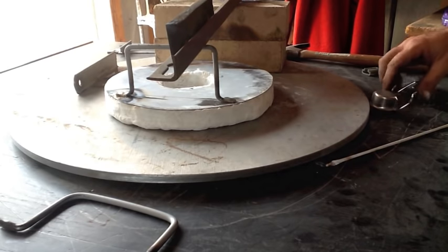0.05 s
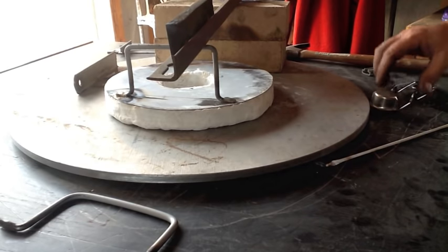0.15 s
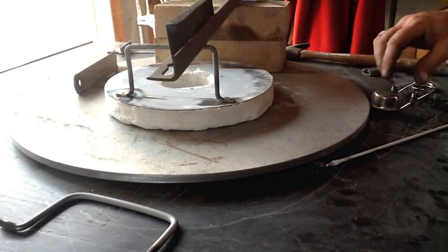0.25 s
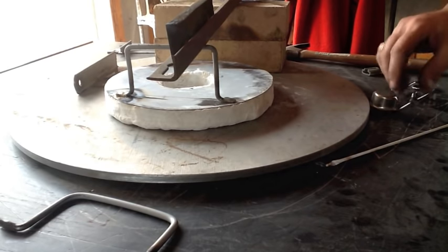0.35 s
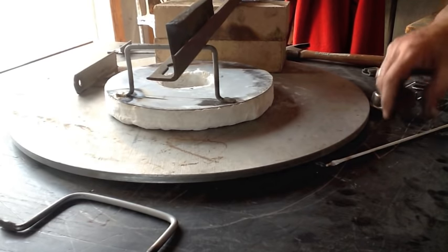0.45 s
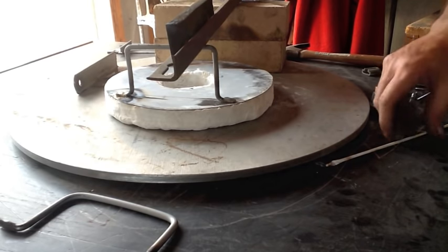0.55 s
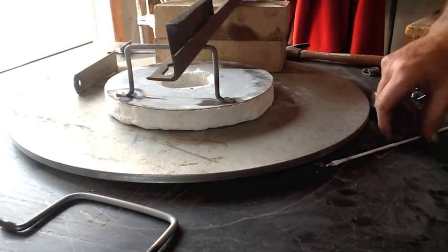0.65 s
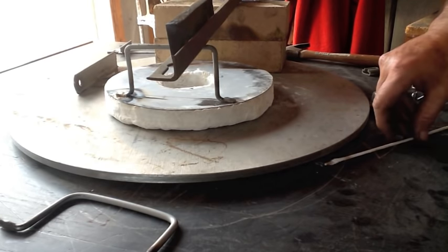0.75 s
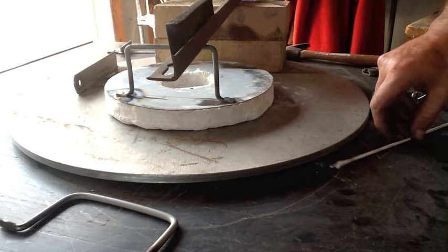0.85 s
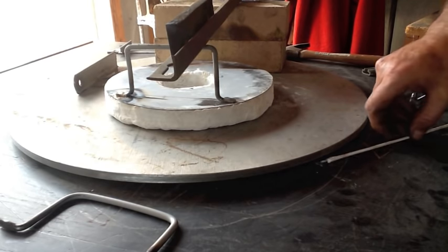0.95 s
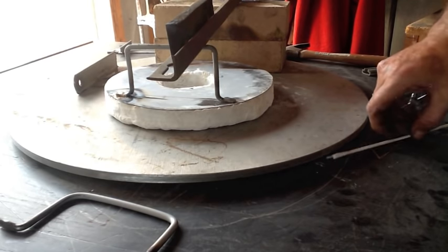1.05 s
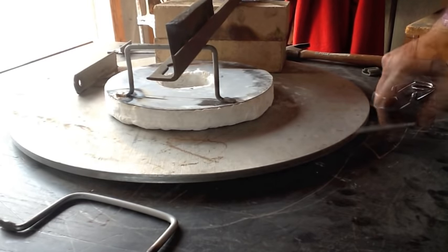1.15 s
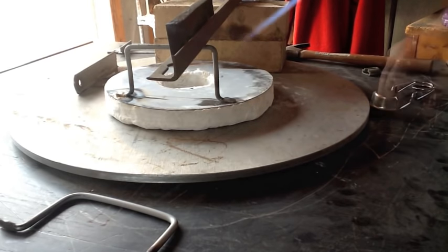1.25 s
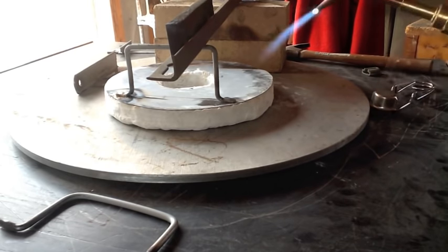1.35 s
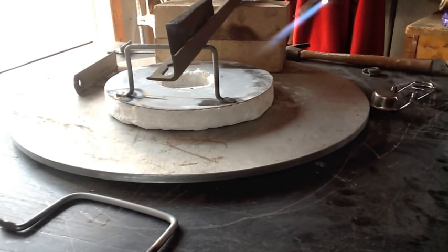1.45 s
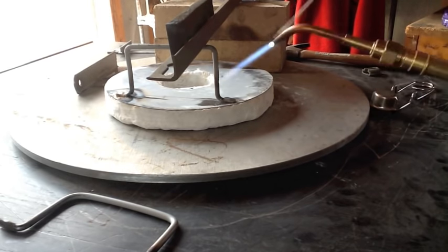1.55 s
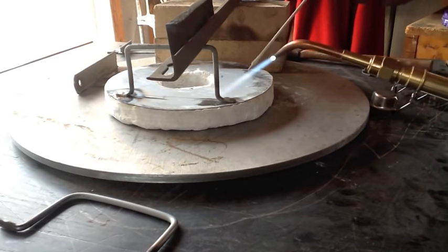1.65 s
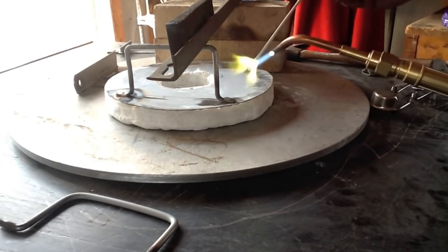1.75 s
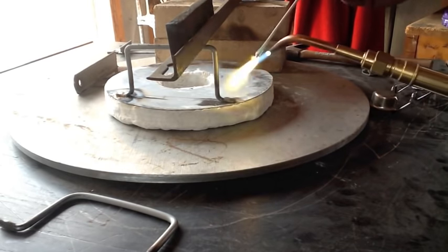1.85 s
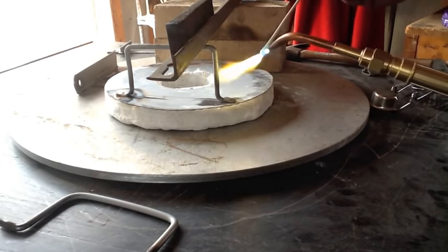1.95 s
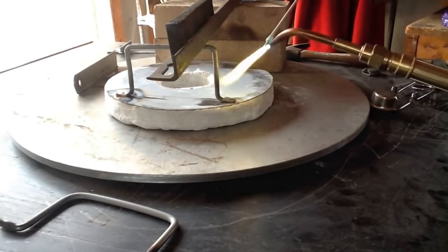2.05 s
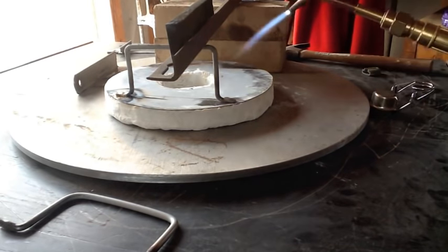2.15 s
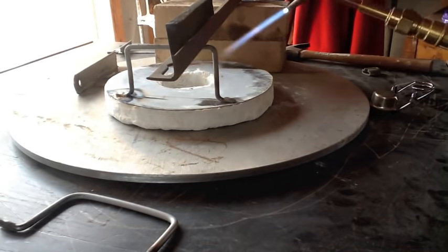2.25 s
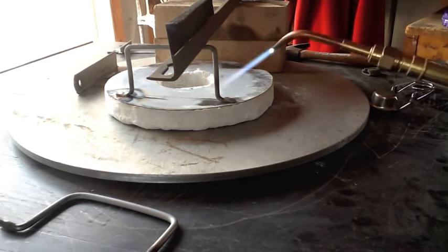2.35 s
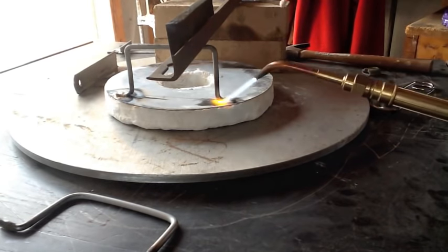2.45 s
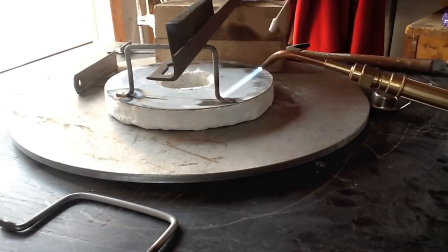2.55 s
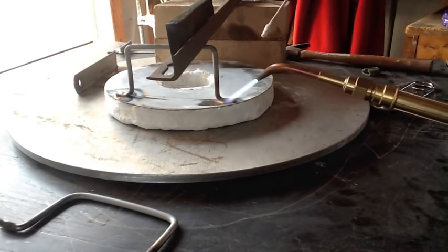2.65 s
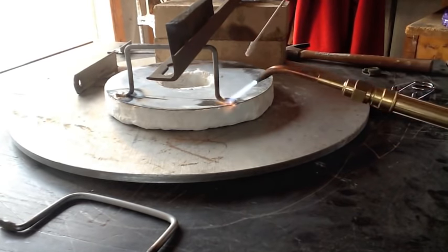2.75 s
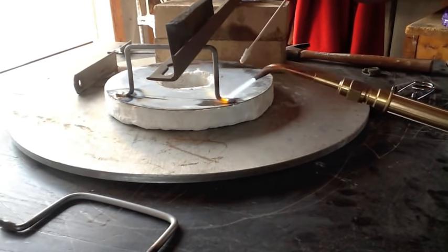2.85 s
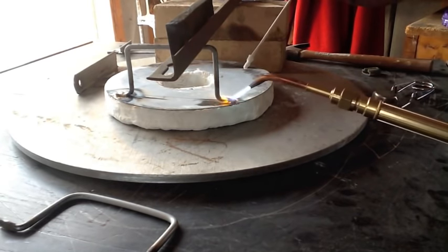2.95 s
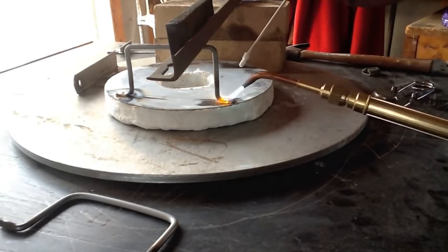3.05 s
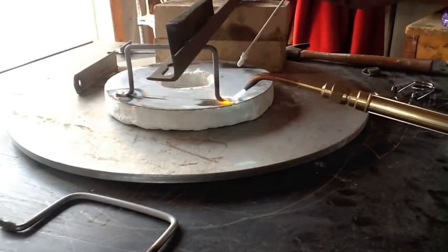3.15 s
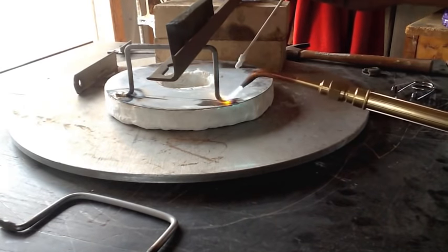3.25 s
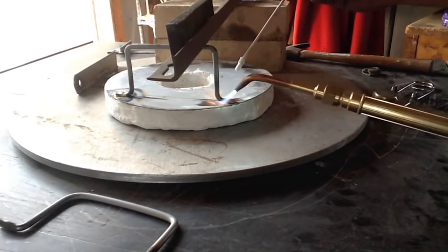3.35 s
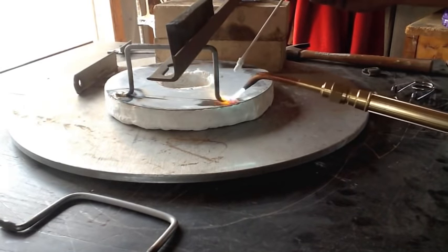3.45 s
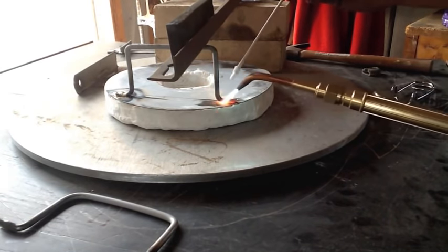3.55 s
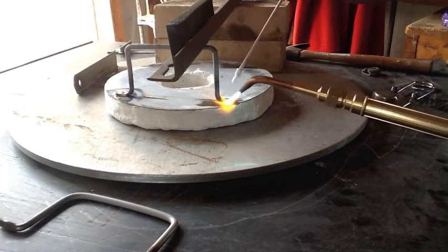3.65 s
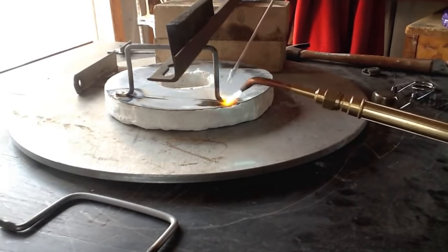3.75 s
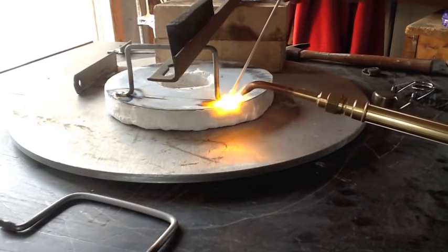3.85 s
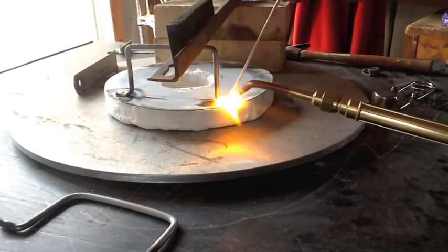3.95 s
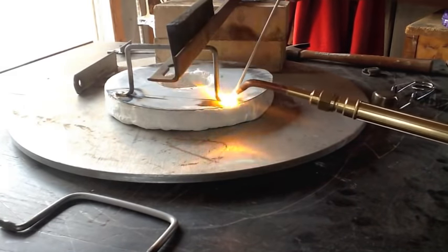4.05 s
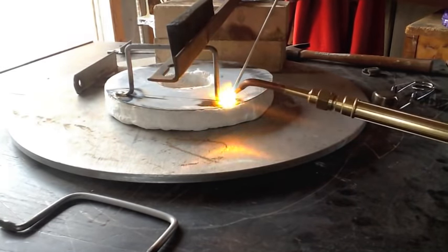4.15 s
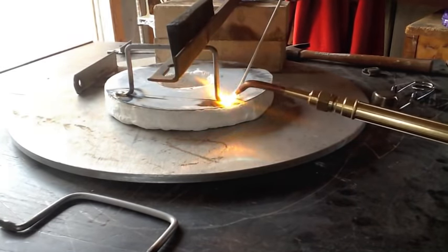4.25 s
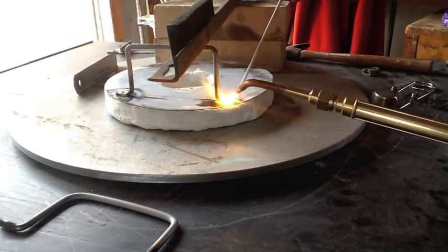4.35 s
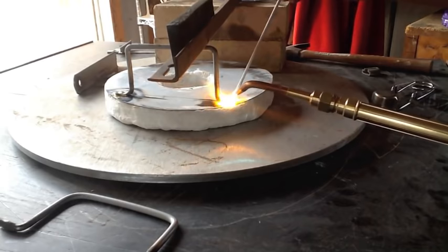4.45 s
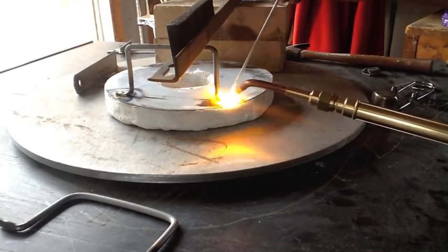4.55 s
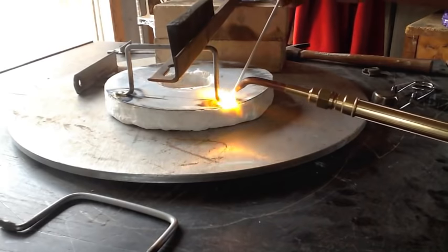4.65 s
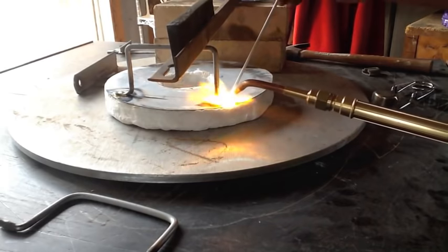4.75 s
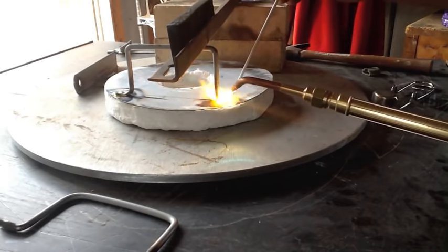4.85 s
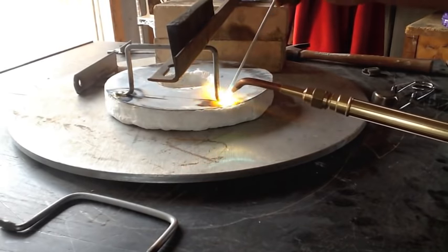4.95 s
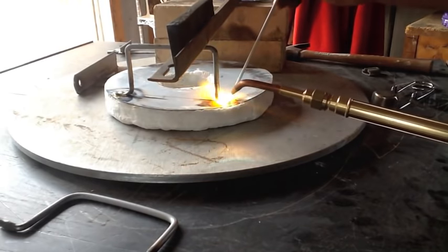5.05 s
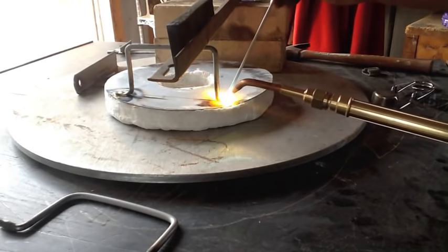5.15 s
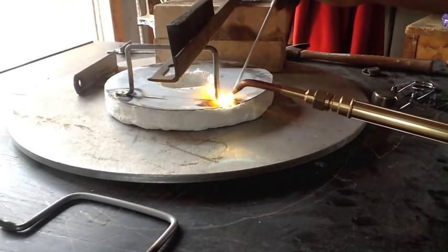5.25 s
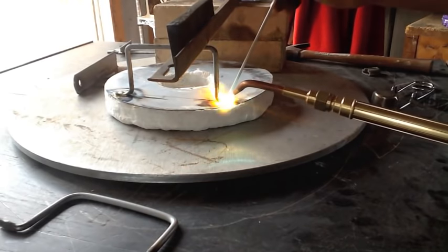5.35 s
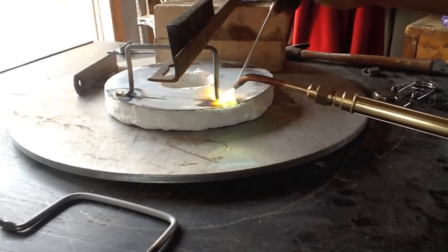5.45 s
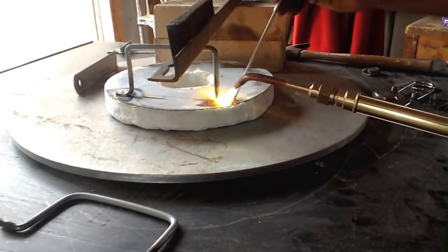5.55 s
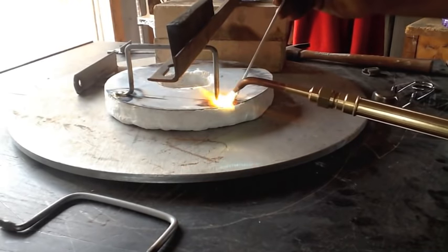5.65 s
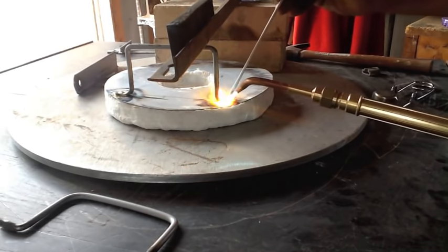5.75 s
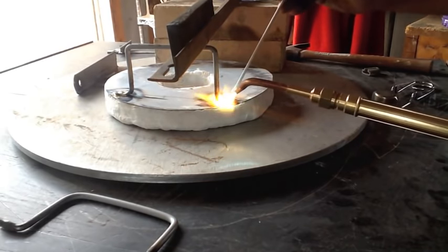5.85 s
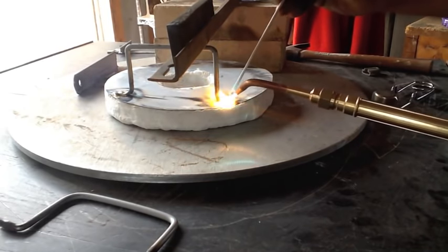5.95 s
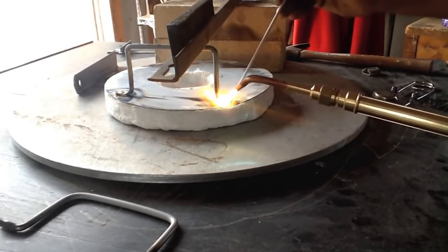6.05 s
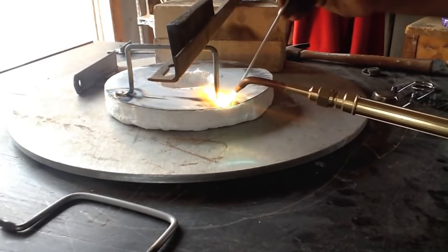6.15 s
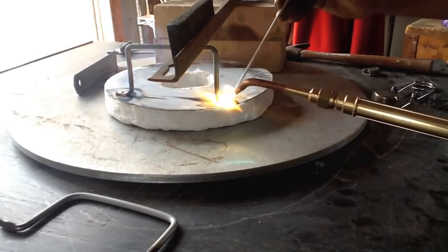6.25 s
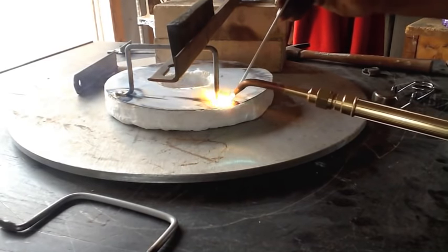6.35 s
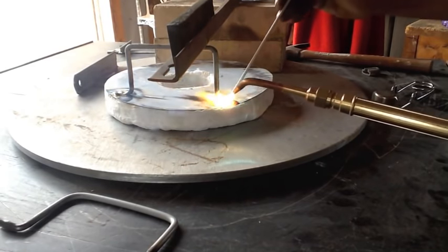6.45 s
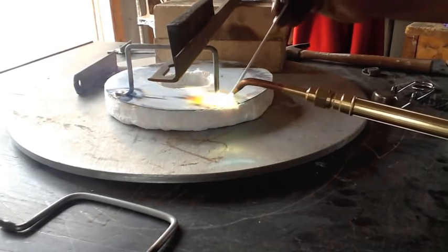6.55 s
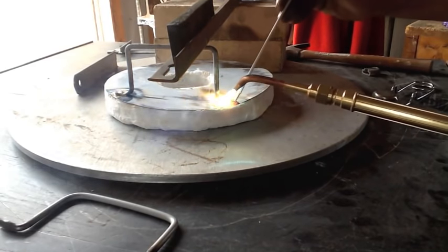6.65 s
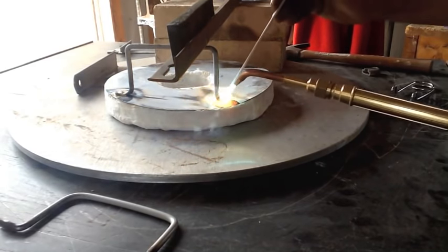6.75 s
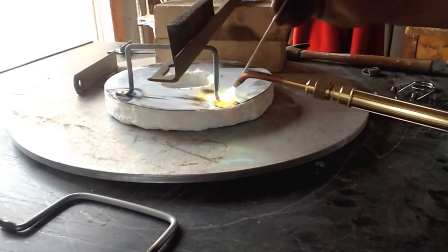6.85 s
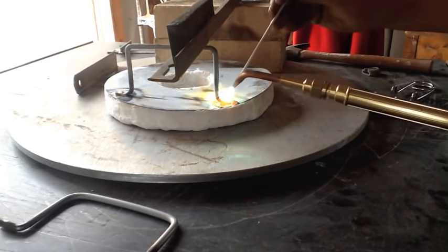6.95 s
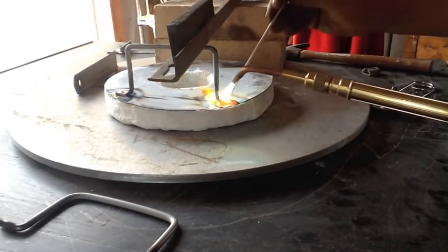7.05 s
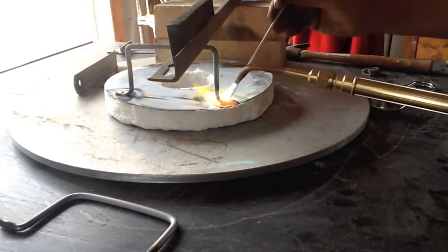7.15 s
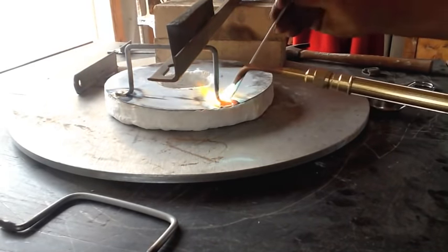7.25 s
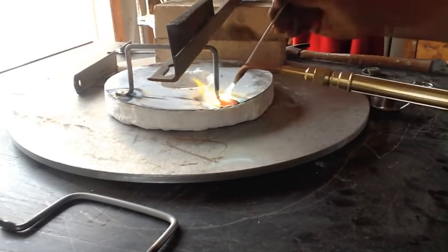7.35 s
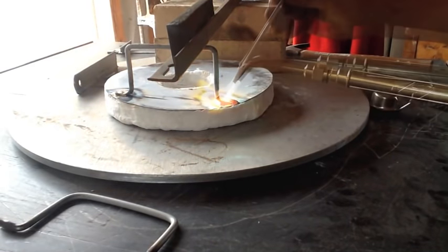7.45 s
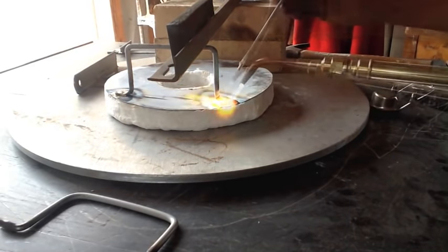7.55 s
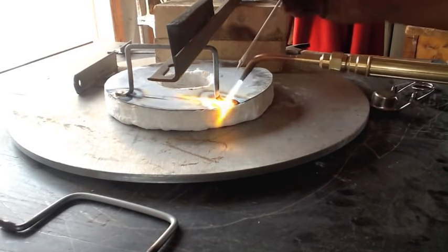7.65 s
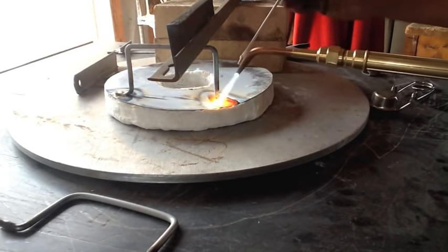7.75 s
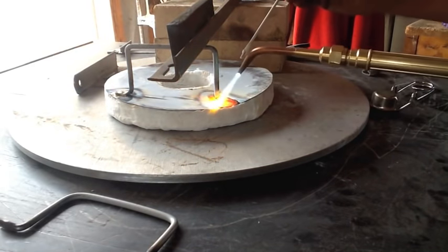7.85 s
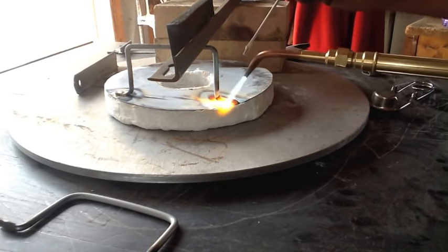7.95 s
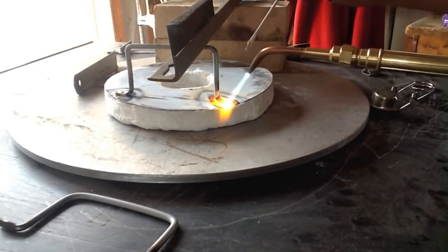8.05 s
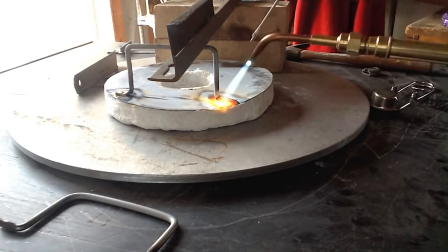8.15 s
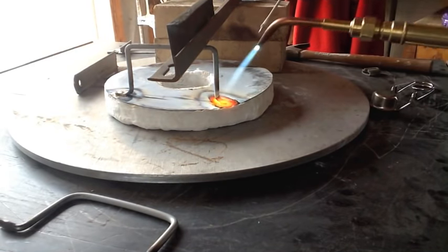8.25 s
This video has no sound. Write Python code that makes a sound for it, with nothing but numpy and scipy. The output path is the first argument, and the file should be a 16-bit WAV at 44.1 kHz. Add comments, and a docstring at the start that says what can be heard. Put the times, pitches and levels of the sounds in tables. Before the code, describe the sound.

A loud clack of steel set down on a bench opens the sound, with a quiet workshop motor hum behind it. The hum fades as a burning gas torch moves up close. Its smooth hiss carries uneven rasps, spits and soft pops, and it whistles faintly while heating a small metal joint. The hiss eases as the torch lifts off with a brief low flutter.

```python
"""A workshop bench: a steel tool slides and is set down with a clack, then a lit gas torch is brought
onto a small metal joint. The nozzle gives a smooth hiss; the burning gas rasps and surges, settles on
the metal, and whistles faintly on its edges while pockets of gas pop and spit. Lifted off, the flame
breaks into a short low roar. The shop's drone and motor hum fade as the torch comes close, and the
drone returns as it leaves."""
import sys
import numpy as np
from scipy import signal
from scipy.fft import rfft, irfft
from scipy.io import wavfile

SR = 44100
rng = np.random.default_rng(int(sys.argv[2]) if len(sys.argv) > 2 else 0)


def store_wav(level_fs):
    """Save 16-bit WAV to argv[1]."""
    pcm = np.round(np.clip(np.atleast_2d(level_fs), -1, 1) * 32767)
    wavfile.write(sys.argv[1], SR, pcm.T.astype(np.int16))


N = 365941
T = np.arange(N) / SR

# Table levels are relative: each layer has its own fader. Colours are spectra, in level per hertz.
# machine drone of the shop: frequency_hz, level_db
DRONE_COLOUR = [(40, -36), (80, -29.5), (110, -9), (150, -7), (240, -8.5), (340, -13.5), (600, -11.5),
                (890, -12), (1300, -18), (1900, -21.5), (2750, -24), (4450, -26), (9000, -30),
                (15000, -35.5)]
# motor hum, wavering and fading out: time_s, level_db
HUM_ENVELOPE = [(0, -41.5), (.3, -47), (.7, -44), (.86, -51.5), (1.1, -44.5), (1.35, -56.5), (1.48, -70),
                (1.56, -100)]
# harmonics of the hum: harmonic_number, level_db
HUM_HARMONICS = [(1, 0.5), (2, -9.5), (3, -23), (4, -18)]

# the steel tool slides on the bench: time_s, level_db
SLIDE_ENVELOPE = [(0, -30), (.015, -33.5), (.035, -38.5), (.053, -39), (.075, -73)]
# resonances of the slide: centre_hz, width_hz, level_db
SLIDE_RESONANCES = [(810, 320, -2.5), (1430, 250, -7), (2400, 830, -24), (5900, 200, -19),
                    (6740, 150, -10.5), (8740, 350, -16), (10500, 400, -15)]
# the tool lands and bounces: start_s, level_db, brightness_hz
CLACKS = [(0.054, -6.5, 15000), (0.0885, -17, 7000), (0.0915, -19.5, 4000), (0.1185, -32, 4500)]
# bright crack of each contact: frequency_hz, level_db
CRACK_COLOUR = [(1500, -30), (2200, 8), (4800, 3.5), (6000, -0.5), (9500, -2.5), (12500, -8), (14000, -12),
                (14900, 7), (15500, -16)]
# ring of the steel: pitch_hz, level_db, t60_s
TOOL_MODES = [(2070, -1, .08), (2225, -2, .14), (2278, -2, .13), (2339, -2, .21), (2397, -1, .12),
              (2625, -3, .16), (3236, 0, .14), (3466, 2, .14), (3935, -6, .18), (4879, -2, .1),
              (4907, -1, .15), (5925, -5, .16), (6568, -7, .17), (7041, -8, .18), (7675, -7, .12),
              (8786, -7, .14), (9156, -6.5, .17), (10730, -12, .18), (13050, -9, .24), (14680, -3, .07),
              (14905, -3, .09), (15130, -4, .07)]
# dead, hard knock of the bench top: pitch_hz, level_db, t60_s
BENCH_MODES = [(2300, -7.5, 0.049), (3540, -2.5, .012), (4830, 0, 0.012)]
# room tail behind the clack: frequency_hz, level_db
ROOM_TAIL_COLOUR = [(150, -4.5), (450, 4), (900, -5), (1550, -4.5), (2250, 0), (3000, -7), (4800, -6),
                    (7000, -8), (9500, -8.5), (12500, -18), (15000, -17)]

# the flame whistles on edges: start_s, length_s, first_hz, middle_hz, last_hz, level_db
EDGE_WHISTLES = [(1.7, .38, 1288, 1232, 1175, -49.5), (1.66, .36, 985, 925, 893, -57),
                 (4.35, 1.3, 525, 506, 498, -74), (4.45, .85, 728, 711, 698, -70),
                 (6.2, .55, 758, 762, 755, -71), (5.6, .4, 1245, 1250, 1255, -61),
                 (6.0, .45, 1460, 1482, 1470, -61), (5.8, .95, 419, 422, 425, -81),
                 (7.15, .55, 1215, 1198, 1178, -59.5)]
# the main whistle slides as the flame works along the joint: time_s, pitch_hz, level_db
JOINT_WHISTLE = [(4.08, 1092, -57), (4.31, 1057, -58), (4.42, 1048, -63), (4.57, 1039, -54),
                 (4.66, 1033, -54), (4.72, 1029, -50.5), (4.79, 1025, -53), (4.89, 1019, -50),
                 (5.06, 1012, -58), (5.22, 1008, -74), (5.55, 1022, -61), (6.06, 1047, -62),
                 (6.27, 1058, -51), (6.31, 1058, -56), (6.35, 1056, -50), (6.40, 1054, -57),
                 (6.46, 1052, -52.5), (6.52, 1048, -58), (6.575, 1044, -48), (6.63, 1037, -55),
                 (6.7, 1028, -57)]
# the jet grazes edges and hollows: start_s, length_s, centre_hz, width_hz, level_db
GRAZES = [(1.5, 0.21, 4970, 450, -51), (2.4, 0.45, 7060, 350, -59), (2.45, 0.47, 10250, 500, -65),
          (3.19, 0.19, 5230, 400, -56)]
# pockets of gas go off, some dull, some sharp: start_s, level_db, pitch_hz
POPS = [(2.825, -35, 2320), (2.850, -27.5, 1520), (2.859, -45, 1210), (2.8679, -27, 2380),
        (2.8835, -38, 1330), (2.892, -33, 1350), (2.985, -33, 1530), (3.037, -34, 1240),
        (3.048, -36.5, 1010), (3.115, -38, 900), (3.122, -37, 1160), (3.217, -34.5, 1110),
        (3.5862, -24.5, 1280), (3.596, -30, 1110), (3.626, -34, 1120), (3.63, -35, 1290),
        (3.962, -42, 1100), (4.042, -28, 1460), (4.160, -30.5, 1150), (4.171, -28, 1480),
        (4.180, -46.5, 1210), (4.260, -37, 1300)]
# bright ticks of spitting gas: start_s, level_db
SPITS = [(2.4544, -38), (2.483, -37), (2.5042, -34), (2.5574, -35), (2.5814, -37), (2.6854, -39)]
# the flame flutters raggedly: start_s, level_db, length_s
FLUTTERS = [(1.884, -45, 0.026), (2.184, -46, .037), (2.843, -41, 0.04), (2.864, -41, 0.04),
            (3.027, -45, 0.05), (3.255, -52, .02), (3.580, -38, 0.028), (3.616, -51, 0.024),
            (3.948, -43.5, 0.032), (4.005, -46, 0.018), (4.036, -46, .014), (4.153, -36, 0.037),
            (4.250, -42, 0.049), (4.315, -46, 0.024), (4.356, -46.5, .02), (5.912, -46, .03),
            (6.752, -46, 0.035), (6.885, -48, .02), (6.92, -49, 0.034), (6.962, -51, .028)]
# midrange body of the flutter: frequency_hz, level_db
FLUTTER_COLOUR = [(100, -42), (330, -19), (550, -2), (850, 7.5), (1500, 7.5), (3000, -20), (6000, -29)]
# hot metal fizzes: start_s, level_db, length_s
FIZZES = [(5.4061, -38, 0.021)]
# the flame roars as it is drawn back: time_s, level_db
ROAR_ENVELOPE = [(8.12, -49), (8.196, -41.5), (8.202, -38), (8.212, -46), (8.23, -40), (8.245, -34),
                 (8.28, -31.5), (8.295, -36)]
# low body of the roar: frequency_hz, level_db
ROAR_COLOUR = [(59, -45), (100, -14), (245, 2), (490, -8.5), (609, 2.5), (1030, -10), (1360, -12),
               (2120, -24), (3380, -30), (4000, -41), (5200, -66), (8800, -120)]
# the flame surges, rasping and hissing harder: start_s, rasp_db, hiss_db, length_s
SURGES = [(1.229, -49.5, -66, 0.088), (1.355, -52, -70, 0.2), (1.383, -51.5, -64, 0.046),
          (1.538, -44, -59, 0.059), (1.598, -47, -55, 0.048), (1.639, -43.5, -48, 0.064),
          (1.69, -44.5, -53, 0.076), (1.794, -40.5, -60, 0.022), (1.85, -51, -62, .05),
          (1.90, -47.5, -52, 0.08), (1.986, -45.5, -53, 0.057), (2.06, -48, -64, 0.031),
          (2.098, -44.5, -57, 0.084), (2.177, -44, -58, 0.043), (2.213, -51, -68, .045),
          (2.256, -47.5, -66, .068), (2.333, -43.5, -56, 0.03), (2.364, -49, -64, .03),
          (2.401, -43.5, -62, .045), (2.436, -48, -58, 0.037), (2.528, -49.5, -65, .1),
          (2.567, -54, -53, 0.02), (2.647, -51.5, -62, .03), (2.76, -56, -68, .035),
          (2.832, -49, -62, .055), (2.907, -55.5, -73, 0.94), (3.195, -62, -58, .08),
          (3.665, -58, -69, 0.05), (3.91, -66, -50, .043), (4.255, -56.5, -64, .045),
          (4.546, -55, -55, .075), (4.731, -46.5, -48, 0.056), (4.885, -51, -62, 0.05),
          (4.975, -50, -49, 0.039), (5.092, -45.5, -60, 0.051), (5.385, -51.5, -55, .045),
          (5.443, -49, -61, .03), (6.103, -48, -53, 0.032), (6.164, -50.5, -61, 0.059),
          (6.218, -49.5, -60, .052), (6.505, -54, -69, .075)]
# rasp of the burning gas: frequency_hz, level_db
RASP_COLOUR = [(700, -38), (1100, -8.5), (1550, -1.5), (1700, -1.5), (1900, 4), (2250, 0.5), (2500, -10.5),
               (2800, -1), (3150, -11.5), (3550, -4.5), (4100, -16), (4900, -7), (6500, -15.5),
               (12000, -42)]
# soft wash of flame over the work: frequency_hz, level_db
WASH_COLOUR = [(40, -39), (200, -41.5), (340, -37), (500, -24), (680, -19.5), (850, -12), (1000, -6),
               (1230, -5), (1650, -6.5), (1900, -6.5), (2500, -9.5), (3400, -13)]
# hiss of the nozzle: frequency_hz, level_db
HISS_COLOUR = [(1760, -24.5), (3000, -7), (3080, -9), (3470, -5.5), (4050, -5.5), (4880, -1.5), (6310, -1),
               (7670, -2.5), (10100, -7.5), (15200, -14), (15800, -18.5)]

ARRIVE_S, SWING_IN_S, AWAY_S, SWING_OUT_S = 1.07, 0.43, 7.906, 0.58   # the torch's move in and out
SETTLED_S, SETTLING_S = 2.56, 0.15   # the flame settles on the metal
DRONE_GONE_S, DRONE_FADE_S, DRONE_BACK_S, DRONE_RETURN_S = 1.527, 0.41, 7.357, 0.42
PEAK_LIMIT, CUTOFF_HZ = .85, 15800


def from_db(db):
    """Decibels to gain."""
    return 10 ** (np.asarray(db) / 20)


def rms_one(x):
    """Scales a signal to rms 1."""
    return x / np.sqrt(np.mean(x ** 2) + 1e-20)


def ramp(silent_s, length_s):
    """A fade from 0 at silent_s to 1 a length later (earlier, if the length is negative)."""
    return np.clip((T - silent_s) / length_s, 0, 1)


def arch(start_s, length_s):
    """A rounded swell and fade."""
    progress = ramp(start_s, length_s)
    return 2 * np.sqrt(progress * (1 - progress))


def swells(events):
    """Each event flares up quickly and sinks back over its length."""
    return sum(from_db(db) * np.sin(np.pi * np.sqrt(ramp(s, length))) for s, db, length in events)


def surge(start_s, length_s, edge_s=0.011):
    """Quick attack, hold, quick release."""
    return ramp(start_s, edge_s) * ramp(start_s + length_s, -edge_s)


def gain_curve(rows, fade_s=0.094):
    """Levels in dB joined by straight lines, dying away outside their span."""
    s, db = np.transpose(rows)
    outside_s = np.maximum(s[0] - T, 0) + np.maximum(T - s[-1], 0)
    return from_db(np.interp(T, s, db)) * np.exp(-(outside_s / fade_s) ** 2)


def drift(rate_hz):
    """A smooth random wander, mostly slower than rate_hz; rms 1."""
    hz = np.arange(N // 2 + 1) * SR / N
    return rms_one(irfft(rfft(rng.standard_normal(N)) / (1 + (hz / rate_hz) ** 2), N))


def flicker(depth_db, rate_hz):
    """An unsteady gain with mean power 1."""
    return rms_one(from_db(depth_db * drift(rate_hz)))


def noise(colour, skirt_db_per_octave=26):
    """Noise of the given colour, falling steeply past its ends; rms 1."""
    hz, db = np.transpose(colour)
    octave = np.log2(np.maximum(np.arange(N // 2 + 1) * SR / N, 1))
    points = np.log2(hz)
    beyond = np.abs(octave - np.clip(octave, points[0], points[-1]))
    spectrum = from_db(np.interp(octave, points, db) - skirt_db_per_octave * beyond)
    return rms_one(irfft(rfft(rng.standard_normal(N)) * spectrum, N))


def resonant_noise(peaks):
    """Broad resonances, each rung by its own noise; rms 1."""
    out = 0
    for hz, width_hz, db in peaks:
        r = np.exp(-np.pi * width_hz / SR)
        poles = [1, -2 * r * np.cos(2 * np.pi * hz / SR), r * r]
        out = out + from_db(db) * (1 - r * r) * signal.lfilter([1, 0, -1], poles, rng.standard_normal(N))
    return rms_one(out)


def band(x, low_hz, high_hz):
    """Keeps what lies between two frequencies."""
    return signal.sosfilt(signal.butter(2, [low_hz, high_hz], "band", fs=SR, output="sos"), x + 1e-18)


def band_noise(low_hz, high_hz):
    """A band of white noise; rms 1."""
    return rms_one(band(rng.standard_normal(N), low_hz, high_hz))


def low_pass(x, top_hz):
    """Dulls everything above top_hz."""
    return signal.sosfilt(signal.butter(2, top_hz, fs=SR, output="sos"), x)


def clicks(events):
    """One click for each row of start_s, level_db."""
    out = np.zeros(N)
    for s, db in events:
        out[round(s * SR)] += from_db(db)
    return out


def decay(hits, t60_s):
    """An envelope that jumps at each hit and dies away."""
    return signal.lfilter([1], [1, -from_db(-60 / (t60_s * SR))], hits + 1e-18)


def struck(hits, modes):
    """Each hit rings a body's modes as dying sines, neighbours in opposite polarity."""
    out = 0
    for k, (hz, db, t60_s) in enumerate(modes):
        r, w = from_db(-60 / (t60_s * SR)), 2 * np.pi * hz / SR
        ring = signal.lfilter([0, np.sin(w)], [1, -2 * r * np.cos(w), r * r], hits + 1e-18)
        out = out + (-1) ** k * from_db(db) * ring
    return out


def shop_drone(level_db):
    """A broad bed of machine noise, faded out while the torch is close."""
    fader = ramp(DRONE_GONE_S, -DRONE_FADE_S) + ramp(DRONE_BACK_S, DRONE_RETURN_S)
    return from_db(level_db) * fader * noise(DRONE_COLOUR)


def motor_hum(level_db, start_hz, sag_hz_per_s, waver_hz):
    """A motor's harmonics waver and sink slightly in pitch."""
    hz = start_hz - sag_hz_per_s * T + waver_hz * drift(rate_hz=4.4)
    phase = 2 * np.pi * np.cumsum(hz) / SR
    hum = rms_one(sum(from_db(db) * np.sin(k * phase) for k, db in HUM_HARMONICS))
    return from_db(level_db) * gain_curve(HUM_ENVELOPE) * hum


def faint_tone(level_db, pitch_hz, start_s, end_s, fade_s):
    """A low tone near the hum's third harmonic swells briefly, unsteady in level, while the hum fades."""
    envelope = ramp(start_s, fade_s) * ramp(end_s, -fade_s) * flicker(depth_db=4.0, rate_hz=11)
    return from_db(level_db) * envelope * np.sqrt(2) * np.sin(2 * np.pi * pitch_hz * T)


def tool_slide(level_db):
    """Steel scrapes grittily across the bench."""
    scrape = resonant_noise(SLIDE_RESONANCES) * flicker(depth_db=2.5, rate_hz=340)
    return from_db(level_db) * gain_curve(SLIDE_ENVELOPE) * scrape


def tool_clack(crack_db, knock_db, ring_db, tail_db, predelay_s):
    """A hard landing and duller bounces: contact crack, bench knock, ringing steel and room tail."""
    hits = clicks((s, db) for s, db, _ in CLACKS)
    grit = noise(CRACK_COLOUR)
    crack = sum(low_pass(decay(clicks([(s, db)]), t60_s=0.02) * grit, top_hz) for s, db, top_hz in CLACKS)
    knock = struck(hits, BENCH_MODES)
    contact = band(from_db(crack_db) * crack + from_db(knock_db) * knock, low_hz=1900, high_hz=19000)
    reflections = clicks((s + predelay_s, db) for s, db, _ in CLACKS)
    tail = decay(reflections, t60_s=0.13) * noise(ROOM_TAIL_COLOUR)
    return contact + from_db(ring_db) * struck(hits, TOOL_MODES) + from_db(tail_db) * tail


def bench_echoes(x, echo_db):
    """The bench, turntable and bricks add a few early echoes."""
    out = x.copy()
    delays_s = rng.uniform(.002, .02, size=8)
    for k, lag in enumerate((delays_s * SR).astype(int)):
        out[lag:] += (-1) ** k * from_db(echo_db) * x[:-lag]
    return out


def edge_tone(hz, pitch_spread):
    """Gas over an edge sings a thin tone that trembles in pitch and level."""
    phase = 2 * np.pi * np.cumsum(hz * (1 + pitch_spread * drift(rate_hz=61))) / SR
    return flicker(depth_db=1.3, rate_hz=20) * np.sqrt(2) * np.sin(phase)


def edge_whistles(level_db, pitch_spread):
    """Brief whistles swell, fade and glide with the flame's distance."""
    out = 0
    for s, length, *pitches, db in EDGE_WHISTLES:
        hz = np.interp(ramp(s, length), [0, .5, 1], pitches)
        out = out + from_db(level_db + db) * arch(s, length) * edge_tone(hz, pitch_spread)
    return out


def joint_whistle(level_db, pitch_spread):
    """The flame draws one long, sliding whistle from the joint."""
    s, hz, db = np.transpose(JOINT_WHISTLE)
    envelope = gain_curve(np.transpose([s, db]))
    return from_db(level_db) * envelope * edge_tone(np.interp(T, s, hz), pitch_spread)


def grazes(level_db):
    """Edges and hollows resonate briefly in the jet and colour the hiss."""
    return sum(from_db(level_db + db) * arch(s, length) * resonant_noise([(hz, width_hz, 0)])
               for s, length, hz, width_hz, db in GRAZES)


def pop(start_s, level_db, pitch_hz, band_ratio=1.41):
    """One dry pressure pulse, a cycle or two long."""
    pulse = band(clicks([(start_s, 0)]), pitch_hz / band_ratio, pitch_hz * band_ratio)
    return from_db(level_db) * pulse / np.abs(pulse).max()


def sputter(pop_db, spit_db, flutter_db):
    """Pockets of gas go off as dry pops in a ragged flutter, or as short bright spits."""
    pops = band(sum(pop(*row) for row in POPS), low_hz=530, high_hz=9200)
    spits = decay(clicks(SPITS), t60_s=.006) * band_noise(low_hz=3200, high_hz=7000)
    spits = band(spits, low_hz=2000, high_hz=14000)
    flutter = swells(FLUTTERS) * noise(FLUTTER_COLOUR) * flicker(depth_db=3.5, rate_hz=170)
    flutter = band(flutter, low_hz=452, high_hz=7000)
    return from_db(pop_db) * pops + from_db(spit_db) * spits + from_db(flutter_db) * flutter


def metal_fizz(level_db):
    """The hot metal gives a tiny, airy fizz."""
    return from_db(level_db) * swells(FIZZES) * band_noise(low_hz=9500, high_hz=16000)


def lift_off_roar(level_db):
    """The lifted flame breaks up into low, lumpy turbulence."""
    turbulence = noise(ROAR_COLOUR) * flicker(depth_db=1.5, rate_hz=67)
    return from_db(level_db) * gain_curve(ROAR_ENVELOPE) * turbulence


def crackle(per_s, spread_db):
    """Tiny pockets of gas snap at random, in all sizes; rms 1."""
    sizes = from_db(spread_db * np.minimum(rng.exponential(1, N), 4)) * rng.choice([-1, 1], N)
    snaps = sizes * (rng.random(N) < per_s / SR)
    return rms_one(band(snaps, low_hz=1500, high_hz=5530))


def flame(near, free_rasp_db, settled_rasp_db, crackle_db, wash_db):
    """Burning gas rasps, crackles and washes over the work in gusts, calmer once it is on the metal."""
    gusts = flicker(depth_db=1.2, rate_hz=95)
    steady = near * (from_db(free_rasp_db) * ramp(SETTLED_S, -SETTLING_S) + from_db(settled_rasp_db))
    surges = sum(from_db(db) * surge(s, length) for s, db, _, length in SURGES)
    burning = noise(RASP_COLOUR) + from_db(crackle_db) * crackle(per_s=380, spread_db=3.0)
    rasp = np.hypot(steady, surges) * burning * flicker(depth_db=1.0, rate_hz=130)
    wash = near * noise(WASH_COLOUR) * flicker(depth_db=0.33, rate_hz=11)
    return gusts * (rasp + from_db(wash_db) * wash)


def hand_sway(x, delay_s, swing_s, echo_db):
    """An echo off the work, its delay moving with the hand, gently flanges the sound."""
    moving_delay_s = delay_s + swing_s * drift(rate_hz=0.93)
    return x + from_db(echo_db) * np.interp(T - moving_delay_s, T, x)


def nozzle_hiss(near, level_db, rise_db_per_s):
    """The gas jet hisses smoothly, creeping up in level and pushing harder in each surge."""
    steady = near * from_db(level_db + rise_db_per_s * (T - ARRIVE_S))
    surges = sum(from_db(db) * surge(s, length) for s, _, db, length in SURGES)
    jet = hand_sway(noise(HISS_COLOUR), delay_s=0.000706, swing_s=0.00013, echo_db=-17)
    return np.hypot(steady, surges) * jet * flicker(depth_db=.5, rate_hz=16)


def scene():
    """The mono mix: shop bed, steel tool, whistles, and the torch up front."""
    bed = shop_drone(level_db=-45)
    bed += motor_hum(level_db=-0.5, start_hz=126.3, sag_hz_per_s=3.07, waver_hz=0.43)
    bed += faint_tone(level_db=-58, pitch_hz=363, start_s=1, end_s=1.507, fade_s=0.15)
    tool = tool_slide(level_db=3)
    tool += tool_clack(crack_db=-4, knock_db=-2, ring_db=-25.5, tail_db=-16.5, predelay_s=.003)
    whistles = edge_whistles(level_db=-4, pitch_spread=0.00867)
    whistles += joint_whistle(level_db=-2.5, pitch_spread=0.00492)
    near = ramp(ARRIVE_S, SWING_IN_S) * ramp(AWAY_S, -SWING_OUT_S)   # 1 while the torch is on the work
    torch = grazes(level_db=1.5) + metal_fizz(level_db=-7.5) + lift_off_roar(level_db=-2)
    torch += sputter(pop_db=0.5, spit_db=2, flutter_db=-7.5)
    torch += flame(near, free_rasp_db=-51, settled_rasp_db=-59.5, crackle_db=-8, wash_db=-52.5)
    torch += nozzle_hiss(near, level_db=-48.5, rise_db_per_s=0.0353)
    mono = bed + tool + whistles + bench_echoes(torch, echo_db=-24.5)
    return np.array([mono, mono])


def record(dry):
    """Soft clipping rounds the loudest peak, and a steep filter cuts the very top."""
    rounded = PEAK_LIMIT * np.tanh(dry / PEAK_LIMIT)
    return signal.sosfilt(signal.ellip(10, .1, 90, CUTOFF_HZ, fs=SR, output="sos"), rounded)


dry = scene()
out = record(dry)
store_wav(out)
```